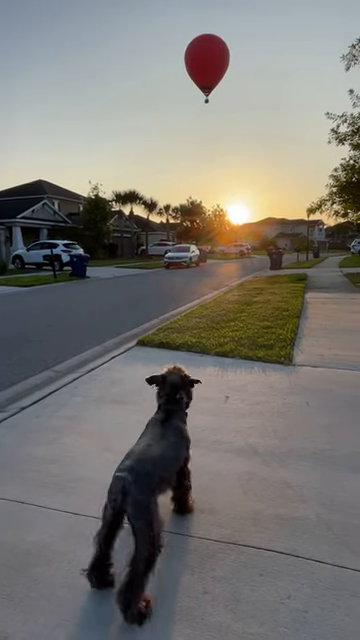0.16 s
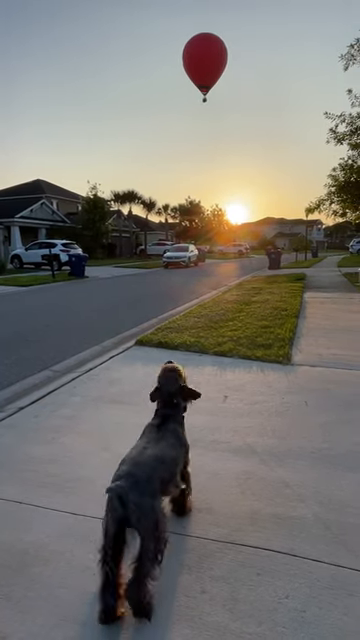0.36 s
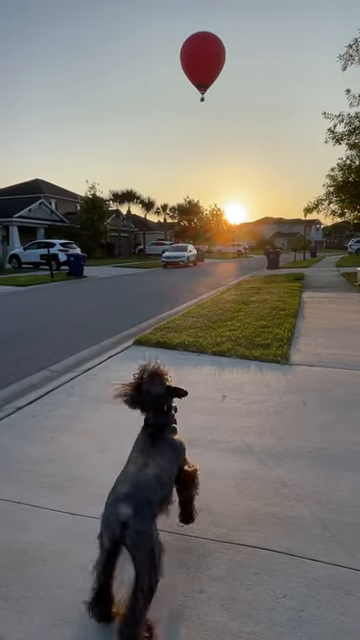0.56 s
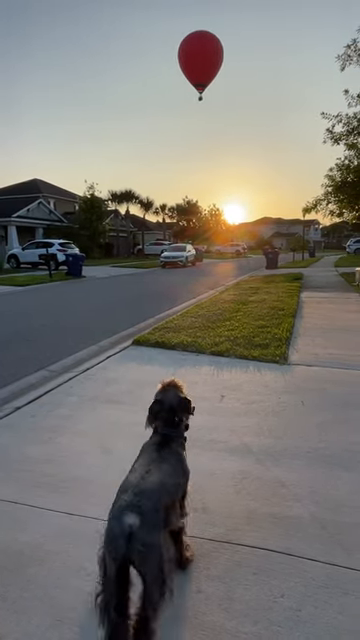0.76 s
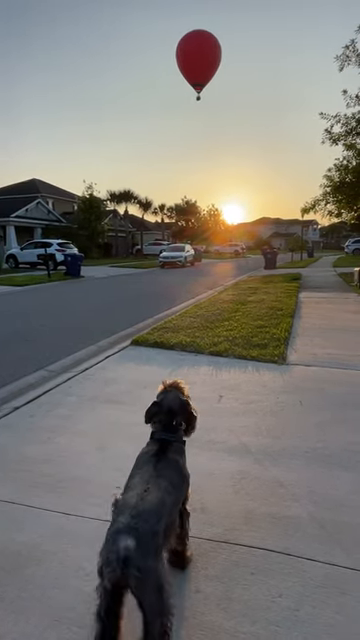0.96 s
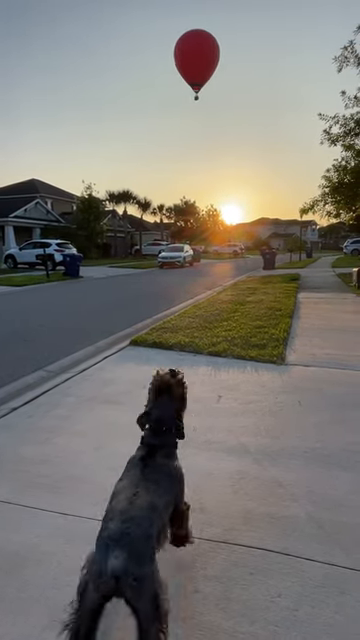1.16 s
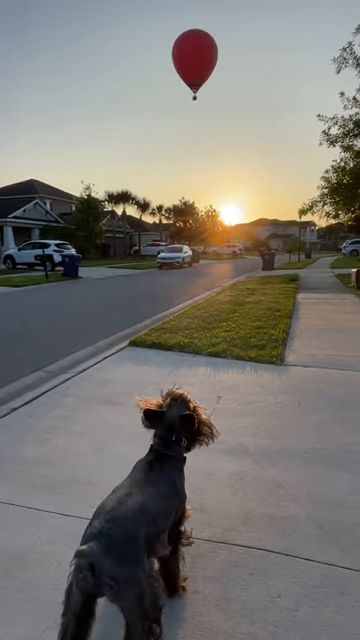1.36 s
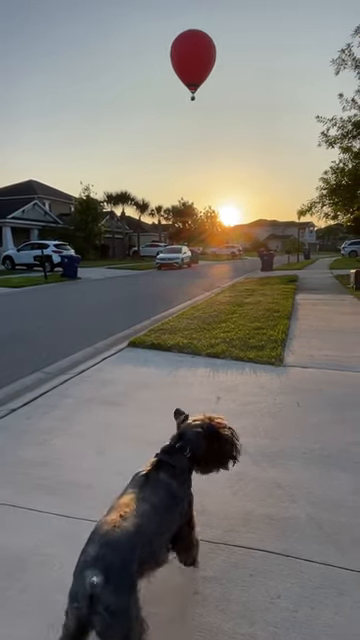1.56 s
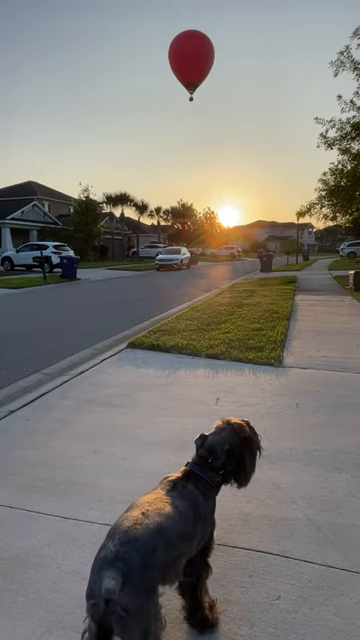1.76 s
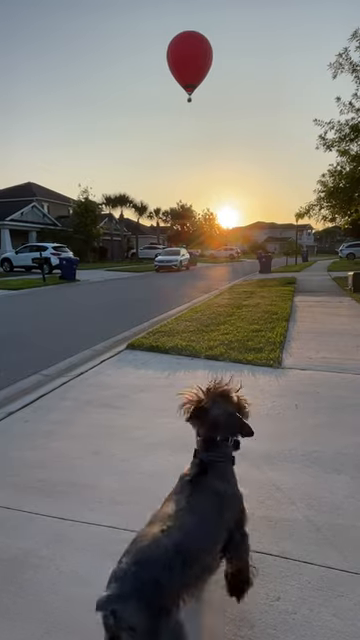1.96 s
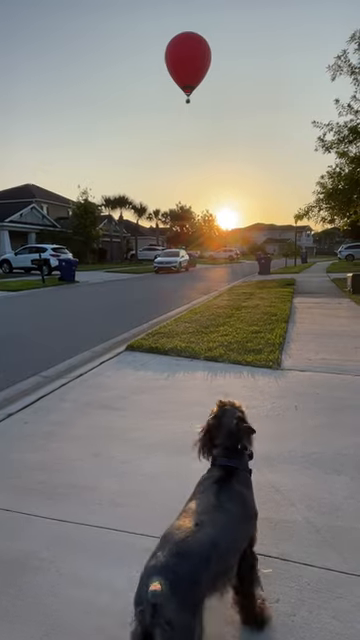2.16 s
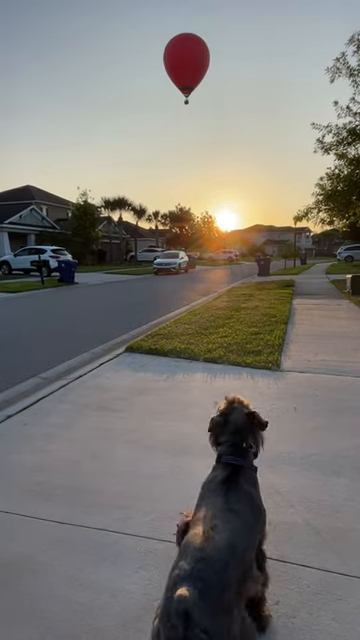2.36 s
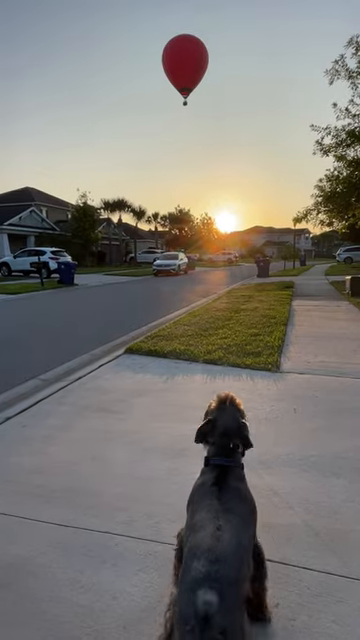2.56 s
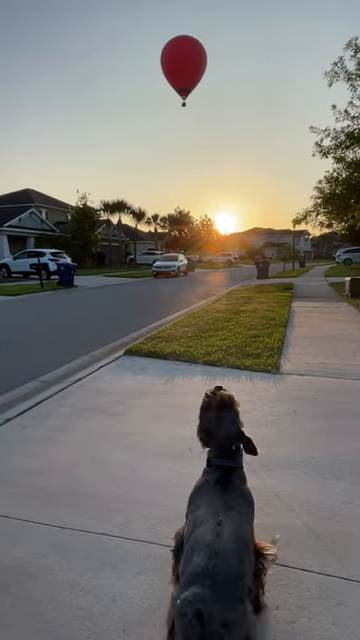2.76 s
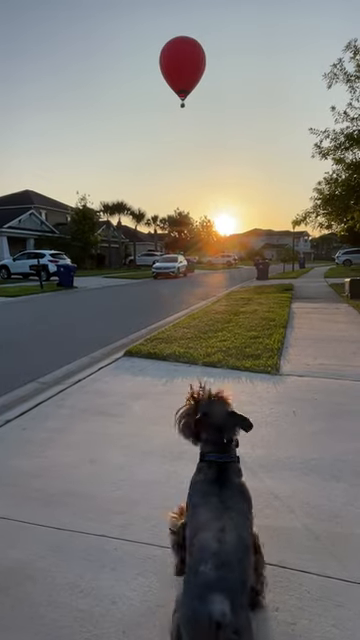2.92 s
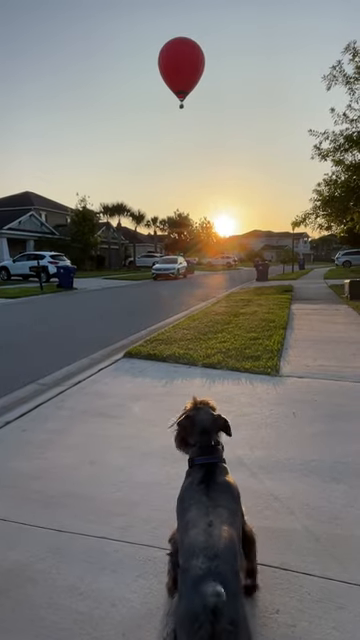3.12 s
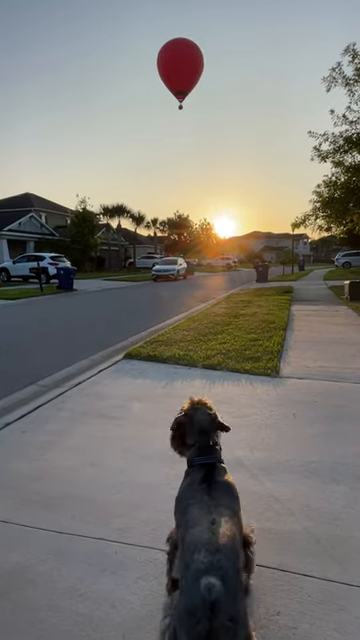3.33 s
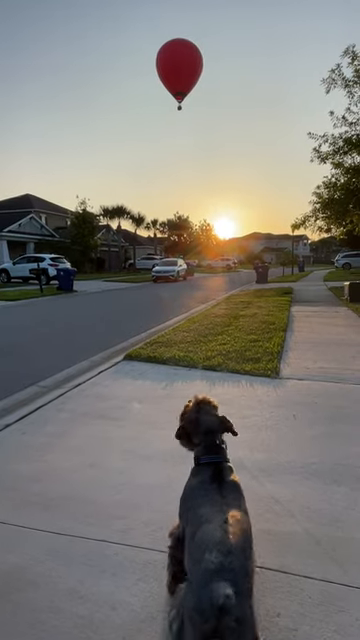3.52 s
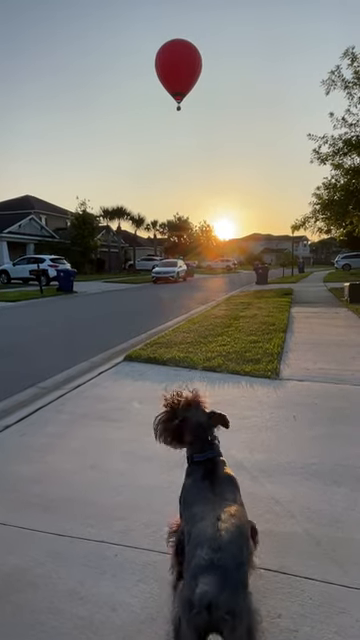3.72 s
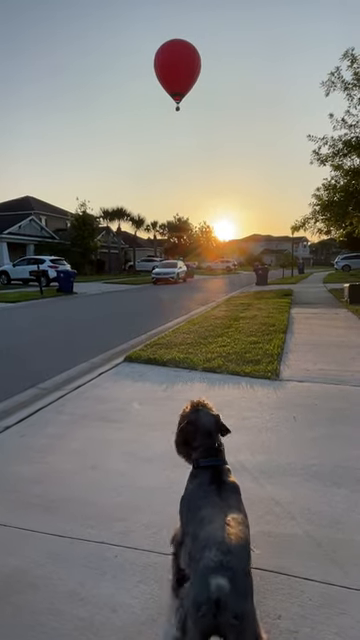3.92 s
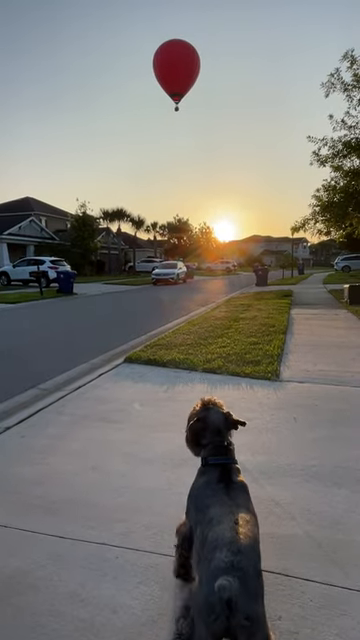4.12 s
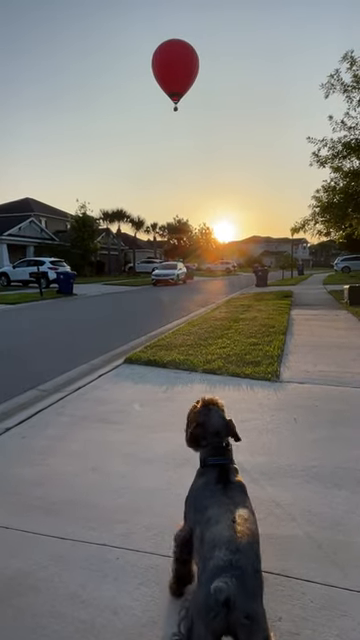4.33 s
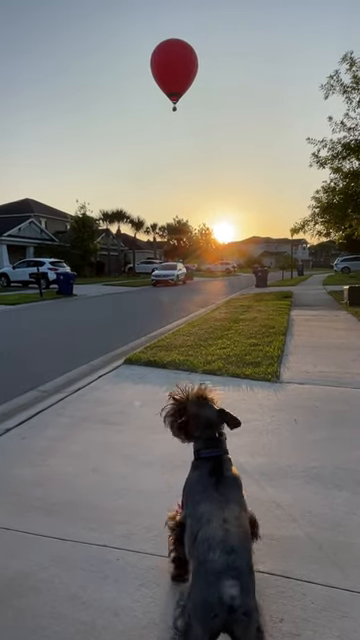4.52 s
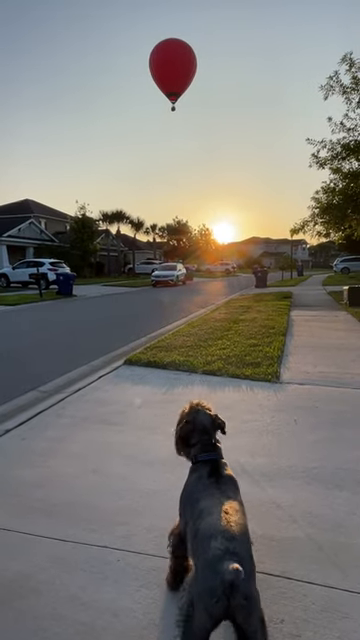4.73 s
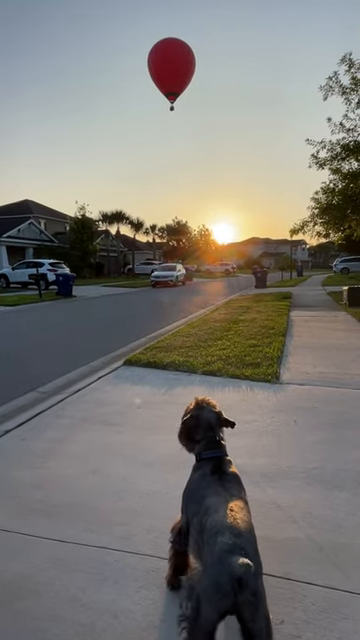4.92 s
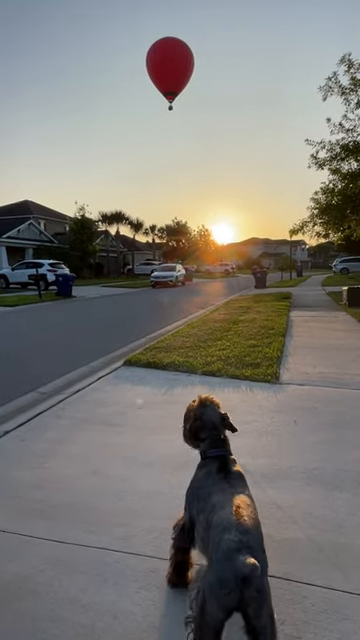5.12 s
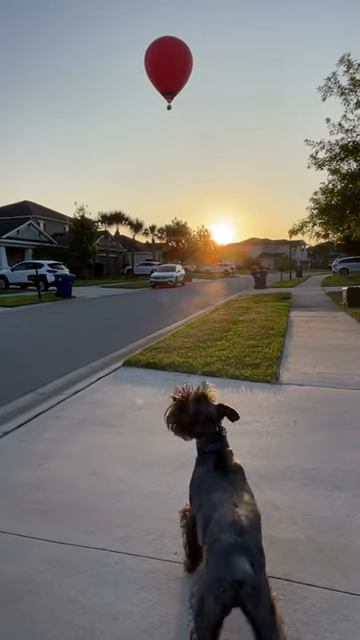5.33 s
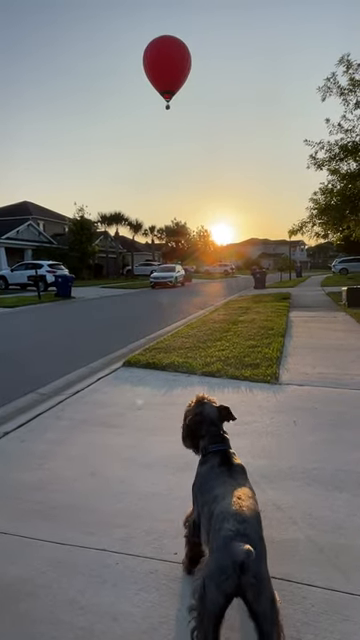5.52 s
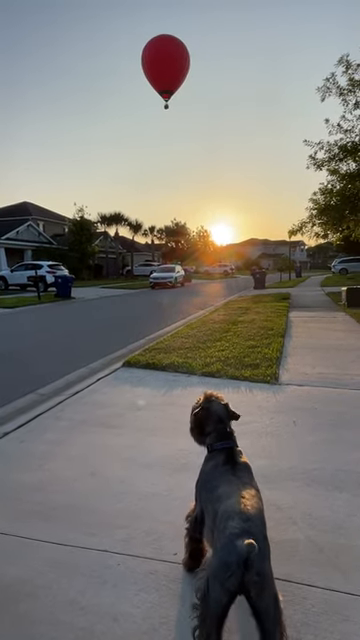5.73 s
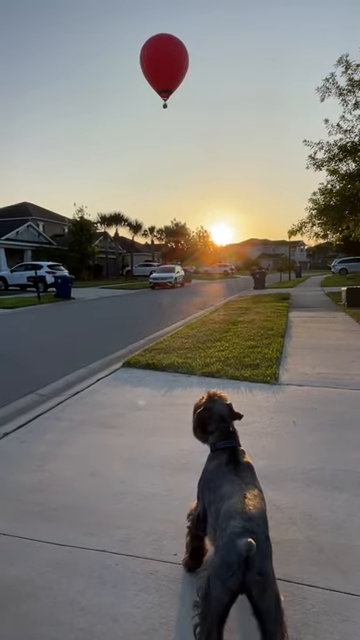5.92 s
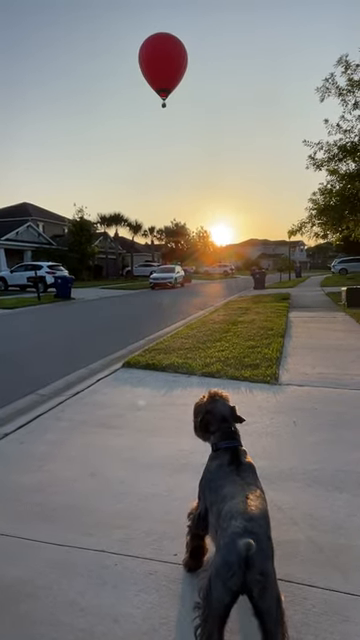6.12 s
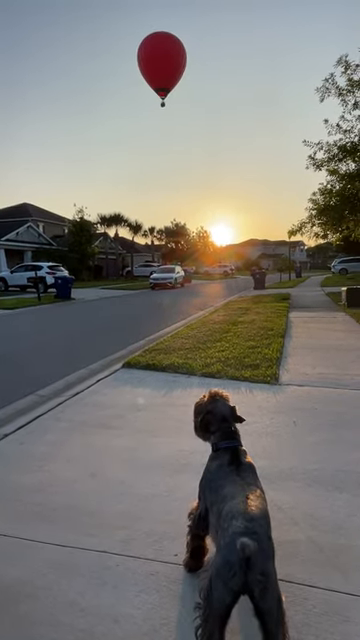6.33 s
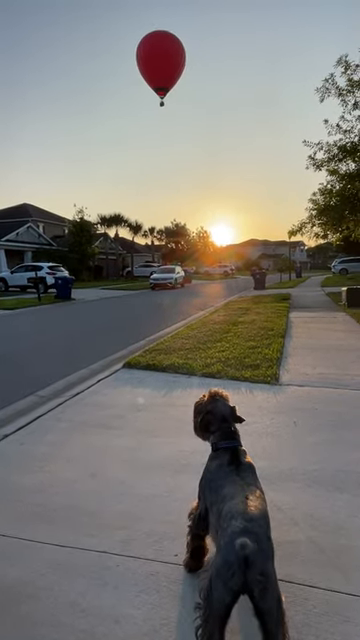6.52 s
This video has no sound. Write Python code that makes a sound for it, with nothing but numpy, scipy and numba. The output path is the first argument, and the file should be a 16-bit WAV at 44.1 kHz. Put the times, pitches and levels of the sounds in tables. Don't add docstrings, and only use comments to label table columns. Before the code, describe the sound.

Seven short, hoarse, throaty dog barks about three-quarters of a second apart, with low growls, light claw scrapes and a faint suburban street echo.

```python
import sys
import numpy as np
from scipy import signal
from scipy.fft import rfft, irfft, next_fast_len
from scipy.io import wavfile
from scipy.ndimage import uniform_filter1d, minimum_filter1d
from numba import njit

SR = 44100
rng = np.random.default_rng(int(sys.argv[2]) if len(sys.argv) > 2 else 0)


def unload_wav(signal):
    wavfile.write(
        sys.argv[1],
        SR,
        np.round(np.clip(np.atleast_2d(signal).T, -1, 1) * 32767).astype(np.int16),
    )


def elevation(decibels):
    levels = np.asarray(decibels, float)
    return 10 ** (levels / 20)


N = 294588
TIME = np.arange(N) / SR
WAVER_DB, WAVER_HZ = 2.5, 45.07


def unit(x):
    return x / np.sqrt(np.mean(x ** 2))


@njit
def svf(x, hz, width):
    y = np.empty(len(x))
    band, low, last_hz = 0., 0., 0.
    g, k, a = 0., 0., 0.
    for i in range(len(x)):
        if hz[i] != last_hz:
            last_hz = hz[i]
            g = np.tan(np.pi * hz[i] / SR)
            k = width / hz[i]
            a = 1 / (1 + g * (g + k))
        v = (band + g * (x[i] - low)) * a
        band = 2 * v - band
        low = low + 2 * g * v
        y[i] = k * v
    return y


@njit
def folds(hz, stretch, size):
    pulses, phase = np.zeros(len(hz) + 1), np.empty(len(hz))
    p, cycle = 0., 0
    for i in range(len(hz)):
        step = hz[i] * stretch[cycle] / SR
        p += step
        if p >= 1:
            p -= 1
            cycle += 1
            pulses[i] += size[cycle] * p / step
            pulses[i + 1] += size[cycle] * (1 - p / step)
        phase[i] = p
    return pulses[:-1], phase


def steep(x, hz, width_hz):
    hz = hz + np.zeros(len(x))
    once = svf(x + 1e-18, hz, 1. * width_hz)
    return svf(once, hz, 1. * width_hz)


def tract(x, modes):
    return unit(sum(elevation(db) * unit(steep(x, hz, width)) for hz, width, db in modes))


def shape(x, points):
    hz, *columns = np.transpose(points)
    size = next_fast_len(N, real=True)
    log_hz = np.log(np.fft.rfftfreq(size, 1 / SR) + 1)
    db, *late = (np.interp(log_hz, np.log(hz), column) for column in columns)
    response = elevation(db) * np.exp(-1j * sum(late))
    return irfft(rfft(x, size) * response, size)[..., :N]


def walk(rate_hz, count=N):
    hold = int(SR / rate_hz)
    levels = np.repeat(rng.standard_normal(N // hold + 1), hold)[:count]
    return unit(uniform_filter1d(uniform_filter1d(levels, hold), hold))


def bell(share, top, spread):
    return np.exp(-((share - top) / spread) ** 2)


def play(calls, lead=0., end=1.):
    rows = np.array(calls)
    now = np.maximum(np.searchsorted(rows[:, 0] + lead * rows[:, 1], TIME) - 1, 0)
    start, length, *columns = rows[now].T
    share = np.clip((TIME - start) / length, lead, end)
    to_edge_s = np.minimum(share - lead, end - share) * length
    return np.clip(to_edge_s / .006, 0, 1), share, length, columns


def steady(x):
    return x / np.sqrt(uniform_filter1d(x ** 2, size=int(.018 * SR)) + 1e-12)


def cavity(postures, away, share):
    jaw_share, jaw_spread = .52, .07
    fade_db = 20.5
    side_on, turned = np.array(postures)[:, :, None]
    early_hz, late_hz, top_db, top, spread = side_on + away * (turned - side_on)
    jaw = .5 + .5 * np.tanh((share - jaw_share) / jaw_spread)
    nearness = bell(((share - top) / spread) ** 2, 0, 0.99)
    db = top_db + WAVER_DB * walk(WAVER_HZ) - fade_db * (1 - nearness)
    return early_hz + jaw * (late_hz - early_hz), db


def bark_rasp(air, away, share):
    # frequency in Hz, level in dB per Hz
    rasp_colour = [(1500, -21.5), (2000, 2.5), (2600, 8), (3150, -14.5), (3350, -13.5), (4400, -16),
                   (5300, -9), (6100, -18), (6900, -21.5), (7800, -34), (9000, -37), (10500, -27.5),
                   (12500, -37), (13500, -60.5)]
    onset_db = np.interp(away, (0, 1), (-15, -19.5))
    sag_db = np.interp(away, (0, 1), (10, 4))
    rasp = elevation(onset_db - share * sag_db) * unit(shape(air, rasp_colour))
    patchy = np.zeros(N)
    for hz in 1900 * 1.5 ** np.arange(6):
        patchy += elevation(4 * walk(WAVER_HZ)) * svf(rasp, np.full(N, hz), .7 * hz)
    return patchy


def barks():
    # onset in seconds, length in seconds, level in dB, head turned away from 0 to 1,
    # throat over mouth in dB
    bark_calls = [
        (.362, 0.12, -23.5, 0, 2),
        (1.099, .14, -23, .2, -0.5),
        (1.783, .12, -22.5, 0.09, -0.5),
        (2.716, .15, -24, 0.99, 2.5),
        (3.545, .15, -22.5, .9, -1.5),
        (4.358, 0.14, -23, 0.84, -1),
        (5.162, .148, -23.5, 0.97, -0.5),
    ]
    # share of the bark's length, level in dB
    effort = [(-.4, -28), (-.15, -19), (0, -3), (.15, -1.5), (.65, -3), (.92, -4), (1.05, -16.5),
              (1.35, -36.5)]
    # Hz before the jaw drops, Hz after,
    # top level in dB re voice, share of the bark where it is loudest, spread as a share
    throat = [(624.2, 680, 5, 0.39, 0.3), (754.6, 660, 11.5, 0.39, 0.41)]
    mouth = [(963, 1050, 7.1, 0.43, 0.58), (873, 1184, 6.33, 0.38, 0.46)]
    muzzle = [(1590, 1350, 2.9, 0.65, 0.79), (1370, 965, 1.4, 0.53, 0.6)]
    # frequency in Hz, width in Hz, level in dB
    chest = [(443, 120, 5), (202, 24, -20)]
    # frequency in Hz, level in dB
    behind = [(80, -20.5), (150, 1.5), (300, -0.5), (360, 8.5), (2000, -10), (3100, -18), (3400, -29.5),
              (16000, -43)]
    jitter, shimmer_db = .11, 2.5

    gate, share, _, (level_db, away, emphasis_db) = play(bark_calls, effort[0][0], effort[-1][0])
    db = level_db + np.interp(share, *np.transpose(effort))
    strain = bell(share, .55, .35)
    pitch_hz = 489.6 + 66.93 * strain
    throat_hz, throat_db = cavity(throat, away, share)
    mouth_hz, mouth_db = cavity(mouth, away, share)
    muzzle_hz, muzzle_db = cavity(muzzle, away, share)

    chance = rng.standard_normal((N // 30, 4)).T
    pulses, phase = folds(pitch_hz, np.exp(jitter * chance[0]), elevation(shimmer_db * chance[1]))
    tissue, _ = folds(throat_hz, np.exp(jitter * chance[2]), elevation(shimmer_db * chance[3]))
    pulses = pulses + tissue
    air = np.exp(-phase / .5) * rng.standard_normal(N)
    rasp = bark_rasp(air, away, share)

    voice = elevation(WAVER_DB * walk(WAVER_HZ)) * steady(steep(pulses, pitch_hz, 175))
    voice = voice + elevation(-25) * bell(share, 0.093, .15) * steady(steep(air, 155.3, 110))
    voice = voice + elevation(-18 + 7.5 * (1 - strain)) * steady(tract(pulses, chest))
    voice = voice - elevation(throat_db + emphasis_db) * steady(steep(pulses, throat_hz, 195))
    voice = voice + elevation(mouth_db - 0.49 * emphasis_db + 5.5) * steady(steep(pulses, mouth_hz, 250))
    voice = voice + elevation(muzzle_db + 5.0) * steady(steep(pulses, muzzle_hz, 560))
    opening = elevation(uniform_filter1d(db + muzzle_db, size=500))
    return gate * (elevation(db + 2.5) * shape(voice, behind) + opening * rasp)


def growls():
    # start in seconds, length in seconds, final level in dB, swell in dB, flap rate in Hz
    growl_calls = [
        (.28, 0.087, -32, 20.5, 25.02),
        (1.035, 0.094, -40.5, 27, 30),
        (1.732, 0.037, -34.5, 15.5, 30.37),
        (2.44, .265, -38.5, 11.5, 38.8),
        (3.435, 0.098, -38.5, 20, 33.5),
        (4.245, .095, -41, 10, 35.35),
        (5.065, 0.084, -43, 4.5, 27),
        (5.87, 0.93, -50.5, 6, 28.61),
    ]
    # frequency in Hz, width in Hz, level in dB
    growl_throat = [(440, 180, 0), (610, 230, -2), (800, 230, -3)]
    growl_chest = [(102, 72, 2.3), (147, 31, -2)]
    growl_nose = [(1280, 110, 0)]
    # frequency in Hz, level in dB
    closed_mouth = [(40, 0), (880, 0), (1050, -12), (1700, -20), (2500, -50), (16000, -80)]

    gate, share, length, (final_db, swell_db, rate_hz) = play(growl_calls)
    elapsed_s = share * length
    db = final_db - swell_db * (1 - share) - 13 * np.exp(-elapsed_s / 0.01)
    flap_hz = rate_hz - 5.5 * elapsed_s
    chance = rng.standard_normal((N // 300, 2)).T
    pulses, phase = folds(flap_hz, np.exp(.1 * chance[0]), elevation(2.2 * chance[1]))
    puffs = np.exp(-phase / .75) * rng.standard_normal(N)
    flaps = .45 * unit(pulses) + unit(puffs)

    chest_hum = elevation(-55.5 - db - 4.5) * tract(flaps, growl_chest)
    nose_leak = elevation(-14.5 + 1.14 * (final_db + 39) + 13.5) * tract(flaps, growl_nose)
    body = chest_hum + nose_leak
    return gate * elevation(db + 4.0) * shape(tract(flaps, growl_throat) + body, closed_mouth)


def scuffs():
    # start in seconds, length in seconds, level in dB, centre in Hz
    scrapes = [(0.027, 0.023, -54, 5500), (.2, 0.017, -72.5, 3580), (.634, 0.0018, -55, 6700),
               (.728, .07, -56, 5000), (1.379, 0.0059, -80.5, 3910), (1.445, 0.0018, -71.5, 4500),
               (1.586, 0.01, -45, 685), (1.643, .013, -47.5, 4530), (1.644, 0.0099, -51.5, 9530),
               (1.664, .005, -76, 5830), (2.238, 0.021, -66.5, 3360), (2.37, .002, -70.5, 4470),
               (2.035, .002, -64, 5000), (2.965, .002, -60.5, 6960), (3.27, .002, -71.5, 7070),
               (4.21, .002, -70, 7000), (5.405, 0.0016, -54, 5500)]
    out, t = np.zeros(N), TIME[:SR // 5]
    grit = rng.standard_normal(N) * elevation(4 * walk(1000))
    for start, length, db, hz in scrapes:
        window = np.clip(t / .001, 0, 1) * np.exp(-np.maximum(t - length, 0) / 0.0028)
        first = int(start * SR)
        here = slice(first, first + len(t))
        out[here] += elevation(db) * window * unit(steep(grit[here], hz, 1.0 * hz))
    return out


def street(sound):
    # delay in seconds, rise in seconds, 60 dB decay in seconds, left dB, right dB
    surfaces = [
        (0.013, 0.00033, 0.051, -17, -19.5),
        (0.18, 0.058, 0.27, -27, -28),
        (0.42, 0.051, 0.075, -42, -47.5),
        (0.068, 0.19, 1, -21, -23.5),
    ]
    # frequency in Hz, level in dB
    bounce = [(100, -27), (330, -3), (550, -2), (800, -11), (1000, -1), (1200, -1), (1500, 4), (2500, -0.5),
              (5000, 10), (12000, 13)]
    t = np.arange(SR * 3 // 2) / SR
    response = 0
    for delay, rise, t60, left_db, right_db in surfaces:
        decay = elevation(-60 * np.maximum(t - delay, 0) / t60)
        swell = np.clip((t - delay) / rise + 1, 0, 1) * decay
        swell = swell / np.sqrt(np.sum(swell ** 2))
        sides = elevation(np.array([[left_db], [right_db]]))
        response = response + sides * swell * rng.standard_normal((2, len(t)))
    scattered = signal.fftconvolve(shape(sound, bounce)[None], response, axes=1)[:, :N]
    porch = steep(np.interp(TIME - .19, TIME, sound), 960, 170)
    return scattered + elevation(np.array((-16, -28)))[:, None] * porch


def rumble(spectrum, swell_db, alike_hz, count=N):
    out, swell = np.zeros((2, N)), walk(2.5, count)
    mid, side = (shape(rng.standard_normal(N), spectrum)[:count] for _ in range(2))
    bands = 30 * 2 ** np.arange(0, 9, .5)
    for hz in bands[(bands > spectrum[0][0]) & (bands < spectrum[-1][0])]:
        gain = elevation(swell_db * swell + 1.4 * walk(14, count))
        alike = gain * svf(mid, np.full(count, hz), hz * .4)
        apart = gain * min(hz / alike_hz, 1) * steep(side, hz, hz * .75)
        out[0, :count] += alike + apart
        out[1, :count] += alike - apart
    return out / np.sqrt(np.mean(out.mean(axis=0)[:count] ** 2))


def passing_car():
    # frequency in Hz, level in dB per Hz
    car_colour = [(90, -28), (150, -15.5), (320, -6), (500, -13.5), (700, -17.5), (1070, -13.5),
                  (1500, -22), (3000, -31), (5200, -30), (6300, -37), (7400, -54), (9500, -43.5),
                  (12300, -54.5), (13300, -78.5)]
    # time in seconds, level in dB
    car_pass = [(0, -50), (.5, -54), (1, -56), (1.4, -52), (1.7, -73.5), (2.2, -84.5), (2.8, -67.5)]
    level_db = np.interp(TIME, *np.transpose(car_pass), right=-120)
    return rumble(car_colour, 0.72, 720, count=int(2.8 * SR)) * elevation(level_db)


def far_tyres():
    # frequency in Hz, level in dB per Hz
    hiss_colour = [(1800, -28), (2600, 1.5), (4000, -8.5), (5200, -2), (6500, -11.5), (8000, -33)]
    return elevation(-90) * rumble(hiss_colour, .6, 850)


def traffic():
    # frequency in Hz, level in dB per Hz
    traffic_colour = [(15, -56.5), (25, -29.5), (64, -1.5), (122, -3), (172, -10.5), (242, -14),
                      (296, -17.5), (341, -20), (732, -13), (913, -19), (1290, -27), (3050, -48.5),
                      (3960, -76.5), (6710, -120)]
    return elevation(-57) * rumble(traffic_colour, .6, 850)


def scene():
    # frequency in Hz, level in dB, radians late
    ports = [(60, 0, 0), (400, -1, .7), (520, -6, 1.6), (780, -14, 1.5), (1030, -6, 5.2), (1300, -11, 6.1),
             (1530, -5, 5.7), (1800, -7, 6.3), (2200, -8, 8.2), (2850, 1, 11.8), (3900, -7, 14.8),
             (5100, -1, 13.8), (6500, -1, 15.6), (11000, 0, 20.4)]
    dog = barks() + growls() + scuffs()
    direct = np.array([dog, shape(dog, ports)])
    return direct + street(dog) + passing_car() + far_tyres() + traffic()


def low_pass(x):
    return signal.sosfilt(signal.butter(12, 15750, fs=SR, output="sos"), x)


def record(dry):
    # frequency in Hz, level in dB
    microphone = [(20, -9), (45, 3.5), (6300, -2.5), (7000, -7), (8000, -14.5), (9000, -1.5), (12300, -3.5),
                  (13500, -18.5), (16000, -20)]
    dry = shape(dry, microphone)
    room = np.minimum(.93 / (np.abs(dry).max(axis=0) + 1e-9), 1)
    gain = uniform_filter1d(minimum_filter1d(room, size=301), size=151)
    return low_pass(dry * gain)


dry = scene()
out = record(dry)
unload_wav(out)
```